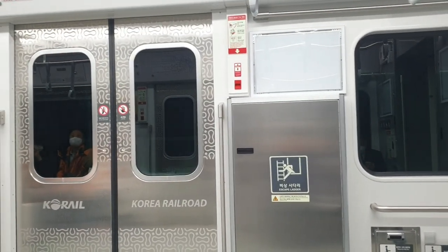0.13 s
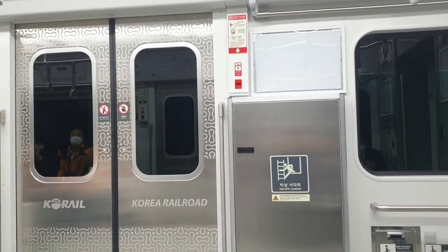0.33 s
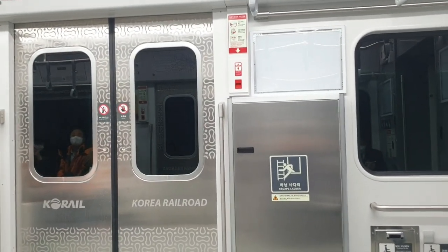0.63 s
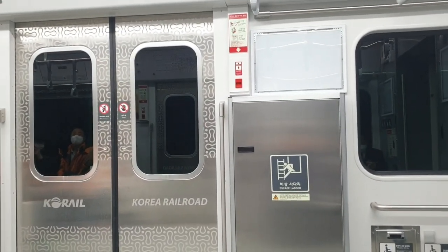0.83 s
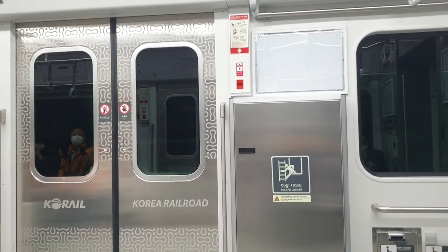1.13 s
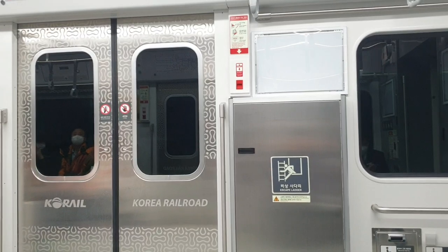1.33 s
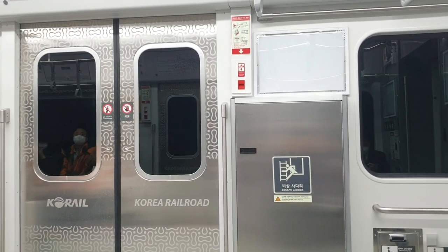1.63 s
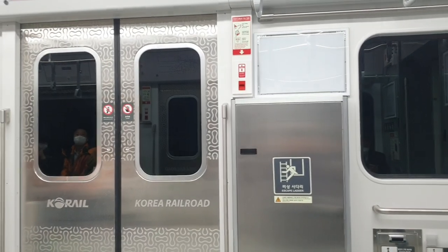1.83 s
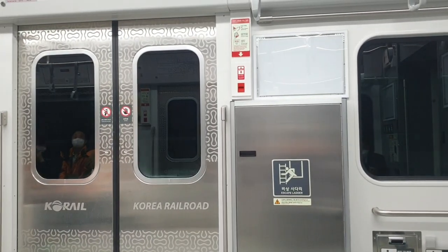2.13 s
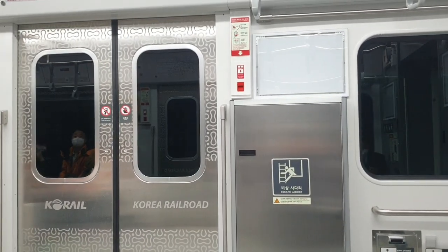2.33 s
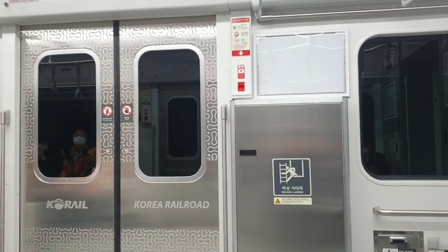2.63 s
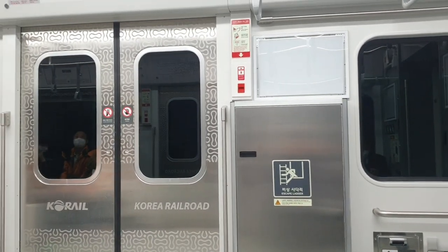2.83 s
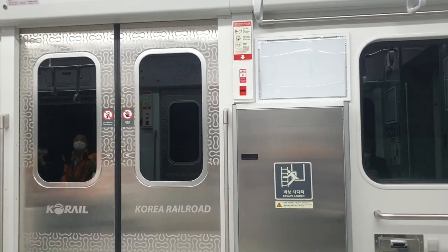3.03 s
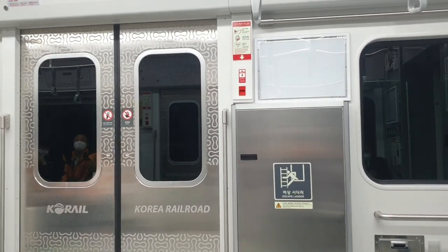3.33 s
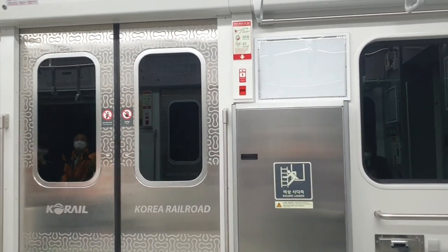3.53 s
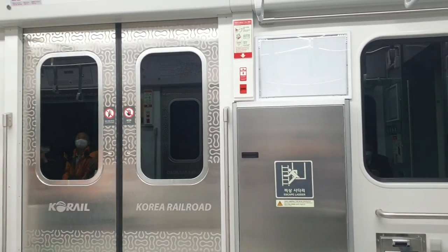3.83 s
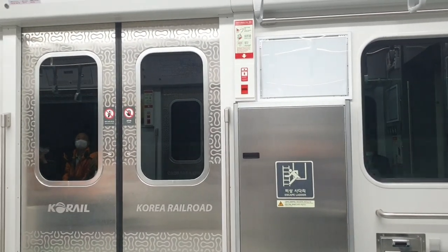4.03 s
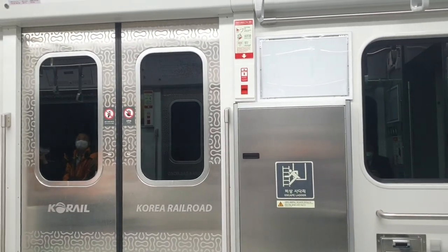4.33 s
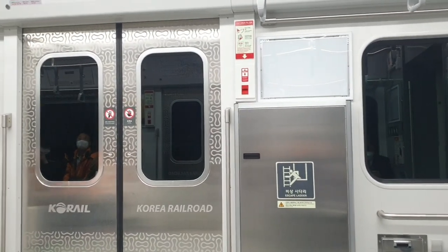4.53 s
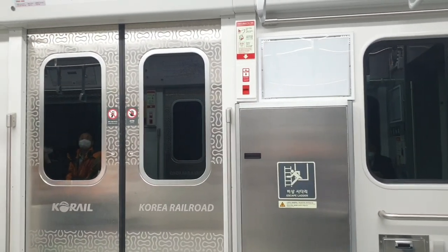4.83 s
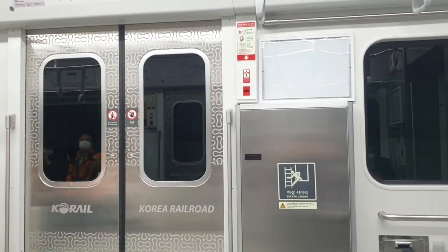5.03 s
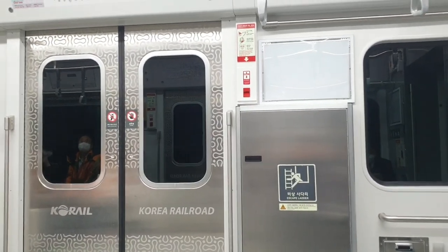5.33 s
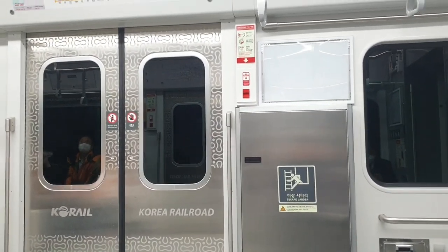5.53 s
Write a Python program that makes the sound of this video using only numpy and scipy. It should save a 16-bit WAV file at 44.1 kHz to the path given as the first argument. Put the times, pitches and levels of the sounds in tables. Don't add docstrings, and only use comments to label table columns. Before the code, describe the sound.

Low, nearly pure bass throbs beneath broad wheel rumble in a closed train car running through a tunnel. Early on, rail joints give heavy and sharp knocks with short echoes, among breathy seal gusts and faint high pings. Later it is mostly rolling noise, with the strongest bass surge just past four seconds. An almost inaudible electric whine sits on top. Hand-held stereo pickup, limited highs.

```python
import sys
import numpy as np
from scipy import signal
from scipy.fft import rfft, irfft
from scipy.io import wavfile
from scipy.ndimage import uniform_filter1d

SR = 44100
rng = np.random.default_rng(int(sys.argv[2]) if len(sys.argv) > 2 else 0)


def makeup_ratio(level_db):
    decades = np.asarray(level_db, float) / 20
    return 10 ** decades


def generate_wav(signal):
    frames = np.transpose(np.atleast_2d(signal))
    scaled = np.clip(frames, -1, 1) * 32767
    pcm = np.round(scaled).astype(np.int16)
    wavfile.write(sys.argv[1], SR, pcm)


N = 250488


def read(points, hz):
    f, value = np.transpose(points)
    return np.interp(np.log(hz + 1), np.log(f + 1), value)


def evened(x):
    return x / np.sqrt(np.mean(x ** 2) + 1e-20)


def drift(rate):
    knots = evened(rng.standard_normal(200))
    return np.interp(np.arange(N) / SR * rate, np.arange(200), knots)


def band_power(db, hz, lo_hz, hi_hz):
    inside = (hz > lo_hz) & (hz < hi_hz)
    return 10 * np.log10(np.sum(makeup_ratio(db[inside]) ** 2))


def resonances(hz, modes):
    return [1 / (1 + ((hz - f) / width * 2) ** 2) for f, width, _ in modes]


# pitch in Hz, likeness (1 is the same, 0 unrelated).
SAME = [(60, 0.94), (150, 0.91), (370, 0.8), (920, -0.041), (2300, 0.018), (5710, -0.14), (14200, 0.26)]


def two_ports(left, other, hz):
    same = np.clip(read(SAME, hz), -1, 1)
    return np.array([left, same * left + np.sqrt(1 - same ** 2) * other])


def noise(field_db, size, patchy_db, flicker_db):
    hop = size // 4
    frames, hz = N // hop + 5, np.fft.rfftfreq(size, 1 / SR)
    a, b, c, d, patches = rng.standard_normal((frames, len(hz), 5)).T
    wide, long = 3 + size // 100, 3500 // hop
    patches = uniform_filter1d(patches, wide, 0, mode="wrap")
    patches = evened(uniform_filter1d(patches, long, 1, mode="wrap"))
    flicker = evened(uniform_filter1d(rng.standard_normal(frames), long // 3, mode="wrap"))
    z = two_ports(a + 1j * b, c + 1j * d, hz[:, None])
    chance_db = np.clip(patchy_db, 0, 1.5) * patches + np.clip(flicker_db, 0, 1) * flicker
    z *= makeup_ratio(field_db(hz, np.arange(frames) * hop / SR) + chance_db)
    return signal.istft(z, nperseg=size, noverlap=size - hop)[1][:, :N] / np.sqrt(1.5)


# middle in seconds, length in seconds, level in dB, pitch in Hz.
JOLTS = [(0.128, 0.11, -22.5, 56.25), (0.26, 0.14, -21, 56.44), (0.422, 0.12, -20, 52.85),
         (0.547, 0.16, -26, 55.4), (0.636, 0.073, -26.5, 56.33), (0.757, 0.065, -33.5, 55),
         (0.979, 0.266, -19, 52.28), (1.345, 0.28, -24, 58.1), (1.595, 0.09, -24, 61),
         (1.682, 0.091, -20, 51.85), (1.834, 0.16, -28, 50.5), (2.024, 0.15, -22, 51.1),
         (2.337, 0.32, -27, 53.5), (2.623, 0.26, -33.5, 55.16), (2.854, 0.11, -24, 56.4),
         (3.109, 0.22, -19.5, 52), (3.333, .32, -17.5, 51.97), (3.622, .12, -31.5, 52),
         (3.85, 0.151, -27.5, 58.3), (4.187, 0.098, -13, 52.2), (4.295, 0.081, -17, 54.67),
         (4.446, 0.073, -22.5, 53.4), (4.706, .16, -36.5, 58.1), (4.967, 0.11, -22, 58.8),
         (5.13, 0.054, -34, 56.35), (5.29, 0.18, -31, 61.7), (5.457, 0.12, -31.5, 58)]


def boom():
    rest_db, rest_hz = -38, 54.83
    flatness = 1.03
    t = np.arange(N) / SR
    power = np.full(N, makeup_ratio(rest_db) ** 2)
    pull = rest_hz * power
    for middle, length, db, hz in JOLTS:
        away = abs(2 * (t - middle) / length)
        swell = makeup_ratio(db - 9.7 * np.minimum(away ** (2 * flatness), 20)) ** 2
        power = power + swell
        pull = pull + hz * swell
    turns = np.cumsum(pull / power * (1 + 0.054 * drift(16))) / SR
    turns = turns + np.array([[.025], [-.025]])
    wave = np.sin(2 * np.pi * turns) + 0.17 * np.sin(4 * np.pi * turns + 0.81)
    return np.sqrt(2 * power) * makeup_ratio(0.93 * drift(18)) * wave


# time in seconds, dB above its mean.
ROLL = [(0, 0.5), (.6, -.5), (.9, 1), (1.5, -1.5), (1.8, 0.5), (2.4, -1), (2.7, 0.5), (3.04, 2.5),
        (3.17, 0), (3.5, -1), (3.9, 1.5), (4.1, 0), (4.24, 2.5), (4.35, -1), (4.63, -1.5), (4.9, 0.5),
        (5.35, -1), (5.68, -0.5)]


def roughness_db(t):
    s, db = np.transpose(ROLL)
    return np.interp(t, s, db)


# pitch in Hz, level in dB per Hz.
RUMBLE = [(15, -55), (25, -18), (35, -6), (47, -6), (65, 3), (86, -18.5), (113, 1), (223, -12),
          (241, -11.5), (440, -14), (570, -19.5), (670, -18), (1200, -32.5), (1560, -68), (2640, -120)]
# pitch in Hz, width in Hz, lift in dB.
PANELS = [(125, 19, -3.5), (166.5, 47, 4.5), (342, 16.7, 6), (460, 53, 5.5)]


def rumble():
    def field_db(hz, t):
        lift = sum(p[2] * r for p, r in zip(PANELS, resonances(hz, PANELS)))
        shape = read(RUMBLE, hz) + lift
        shape = shape - band_power(shape, hz, 75, 700)
        return shape[:, None] - 22.5 + roughness_db(t)
    return noise(field_db, size=2048, patchy_db=0.02, flicker_db=0.3)


# pitch in Hz, level in dB per Hz.
ROAR = [(530, -11), (900, -3.5), (1110, -8.5), (1260, -5), (1770, -10), (2190, -7), (2370, -10.5),
        (2830, -11), (3030, -20), (3490, -21), (4950, -31), (7450, -33.5), (8570, -38.5), (11200, -37),
        (14700, -41.5)]


def roar():
    def field_db(hz, t):
        shape = read(ROAR, hz)
        shape = shape - band_power(shape, hz, 900, 3200)
        return shape[:, None] - 38.5 + 1.33 * roughness_db(t)
    return noise(field_db, size=512, patchy_db=0.77, flicker_db=0.3)


# start in seconds, then levels in dB of the clack (2
# kHz), thud (500 Hz), edge (5.5 kHz) and tick (11 kHz).
KNOCKS = [
    (0.2142, -21, -17, -51, -76),
    (0.2312, -38.5, -30, -41.5, -77.5),
    (0.5034, -36.5, -36, -47.5, -67),
    (0.7876, -30.5, -41, -54, -64),
    (0.8174, -27.5, -26, -40, -63),
    (1.179, -24.5, -23.5, -33, -41),
    (1.3124, -47.5, -40, -41, -41.5),
    (1.547, -23.5, -24, -47.5, -78.5),
    (1.7654, -43, -37, -66, -68),
    (3.998, -48, -28.5, -66, -73),
]
CLACK = [(1450, 570, 4), (2080, 580, -16), (2720, 1070, -0.5)], 1.33
THUD = [(373, 33, 3), (540, 30, -1.5), (682, 170, -6.5)], 0.8
EDGE = [(4220, 720, -2), (6270, 2300, -12.5)], 1.23
TICK = [(9900, 3300, -4), (12400, 5400, -4.5)], 2.3


def knocks():
    t60_s, early_s = 0.36, .0015
    t, out = np.arange(SR // 2) / SR, np.zeros((2, N + SR))
    hz = np.fft.rfftfreq(len(t), 1 / SR)
    soft = 1 - np.exp(-(t / .001) ** 2)
    echoes = rng.standard_normal((len(KNOCKS), 2, len(t)))
    for (start, *dbs), echo in zip(KNOCKS, echoes):
        left, other = rfft(echo)
        ports = two_ports(left, other, hz)
        first = round((start - early_s) * SR)
        for db, (modes, speed) in zip(dbs, (CLACK, THUD, EDGE, TICK)):
            colour = sum(makeup_ratio(m[2]) * r for m, r in zip(modes, resonances(hz, modes)))
            blow = sum(makeup_ratio(g) * np.sin(2 * np.pi * f * t) * np.exp(-np.pi * width * t * .6)
                       for f, width, g in modes)
            fade = (1 - np.exp(-t / .0015)) * makeup_ratio(-60 * speed * t / t60_s)
            tail = evened(irfft(ports * colour)) * fade
            out[:, first:][:, :len(t)] += makeup_ratio(db - 7.0) * (1.5 * blow * soft + tail)
    return out[:, :N]


# start in seconds, length in seconds, level in dB,
# brightness in dB per octave.
GUSTS = [(0.032, 0.24, -56, -7), (0.308, 0.42, -51.5, -1), (.47, 0.19, -57, -3.5), (0.61, 0.22, -57, 5),
         (.77, 0.19, -45.5, -0.5), (1.031, 0.23, -52, -9), (1.174, 0.12, -42, -3), (1.318, 0.27, -55, 2),
         (1.85, 0.23, -62, -3), (2.37, .32, -61, 7), (2.831, 0.2, -48, -2), (2.967, 0.31, -47.5, -2.5),
         (3.358, .3, -59.5, 6), (4.101, 0.25, -48, -1.5), (4.86, 0.26, -73, 5), (5.647, .1, -51, -8)]
# pitch in Hz, level in dB per Hz.
HISS = [(880, -36), (1500, -15), (2160, -8), (3410, -12.5), (4200, -13), (4760, -18), (6710, -18.5),
        (8680, -23.5), (11200, -21), (13500, -28.5), (14700, -43)]


def gusts():
    rise_share, fade_db = 0.34, -9.5

    def field_db(hz, t):
        power = np.full((len(hz), len(t)), 1e-16)
        octaves = np.log2(np.maximum(hz, 2000) / 7000)
        for start, length, db, tilt in GUSTS:
            shape = read(HISS, hz) + octaves * tilt
            shape = shape - band_power(shape, hz, 3500, SR)
            u = (t - start) / length
            rise = np.sin(np.pi / 2 * np.clip(u / rise_share, 0, 1))
            level = rise * makeup_ratio(db + fade_db * np.clip(u, 0, 3) ** 2.0)
            power = power + np.outer(makeup_ratio(shape), level) ** 2
        return 10 * np.log10(power)
    return noise(field_db, size=256, patchy_db=1.0, flicker_db=5.0)


# start in seconds, level in dB, seconds the rattle holds it,
# seconds to fall by 60 dB.
PINGS = [
    (.043, -57.5, .01, 0.27),
    (0.63, -53, 0.058, 0.11),
    (1.321, -43, .015, 0.31),
]


def pings():
    ping_hz, snap_s, snap_db = 10394, 2.9032, -35
    t, out = np.arange(SR // 2) / SR, np.zeros(N + SR)
    build = 1 - np.exp(-(t / 0.0036) ** 2)
    for start, db, held, t60 in PINGS:
        fade = makeup_ratio(db - 60 * np.maximum(t - held, 0) / t60)
        out[round(start * SR):][:len(t)] += build * fade * np.sin(2 * np.pi * ping_hz * t)
    snap = np.exp(-t / .00012) * np.sin(2 * np.pi * 12500 * t)
    out[round(snap_s * SR):][:len(t)] += makeup_ratio(snap_db) * snap
    ports = np.array([out[:N], np.roll(out, 18)[:N]])
    return ports * makeup_ratio(1.6 * drift(26))


# pitch in Hz, level in dB.
WHINE = [(13001, -83), (7499, -90), (6501, -90)]


def whine():
    t = np.arange(N) / SR + np.array([[0], [.00044]])
    out = np.zeros((2, N))
    for hz, db in WHINE:
        out += makeup_ratio(db + 3 * drift(6)) * np.sin(2 * np.pi * hz * t + .6 * drift(25))
    return out


def scene():
    return boom() + rumble() + roar() + knocks() + gusts() + pings() + whine()


# pitch in Hz, left minus right in dB.
LEAN = [(60, -3.5), (120, -2.5), (240, -2.0), (470, -2.5), (920, -3.5), (1830, -7.0), (3620, -8.0),
        (7170, 0.5), (14200, -1.5)]


def microphones(dry):
    hz = np.fft.rfftfreq(N + SR, 1 / SR)
    padded = np.pad(dry, [(0, 0), (SR // 2, SR // 2)], "reflect")
    lean_db = read(LEAN, hz) / 2
    low_cut = 1 / np.sqrt(1 + (45 / (hz + 1)) ** 6.5)
    spectrum = rfft(padded) * makeup_ratio([lean_db, -lean_db]) * low_cut
    return irfft(spectrum, N + SR)[:, SR // 2:][:, :N]


# pitch in Hz, share of quiet cells muted.
HOLES = [(7500, 0), (8000, .86), (9500, .84), (10300, .62), (11600, .52), (12500, .74), (14500, .8)]


def gate(x):
    masking = .55
    hz, _, z = signal.stft(x, SR, nperseg=2048, noverlap=1536)
    power = (abs(z) ** 2).sum(0) + 1e-20
    around = abs(uniform_filter1d(power, size=151, axis=0)) ** masking
    power = uniform_filter1d(power / around, size=2, axis=0)
    power = uniform_filter1d(power, size=2, axis=1)
    rank = (read(HOLES, hz) * power.shape[1]).astype(int)[:, None]
    edge = np.take_along_axis(np.sort(power, axis=1), rank, axis=1)
    edge = uniform_filter1d(edge, size=25, axis=0)
    kept = (power >= edge) | (rank == 0)
    return signal.istft(z * kept, SR, nperseg=2048, noverlap=1536)[1][:, :N]


def band_limit(x):
    return signal.sosfilt(signal.butter(12, 14600, fs=SR, output="sos"), x)


def record(dry):
    mix = gate(microphones(dry))
    return band_limit(mix)


dry = scene()
out = record(dry)
generate_wav(out)
```